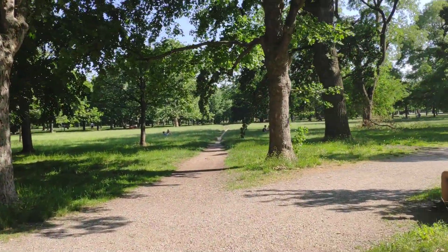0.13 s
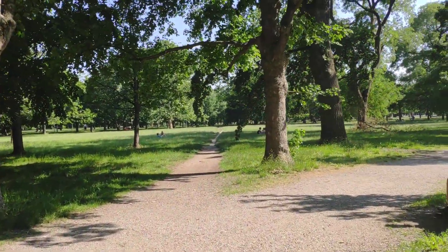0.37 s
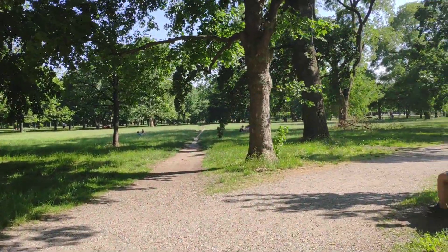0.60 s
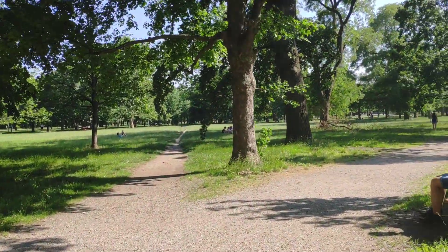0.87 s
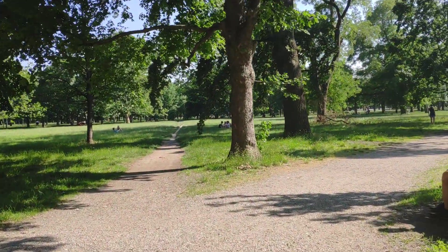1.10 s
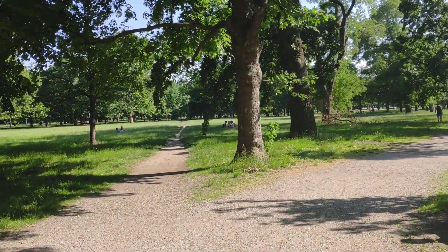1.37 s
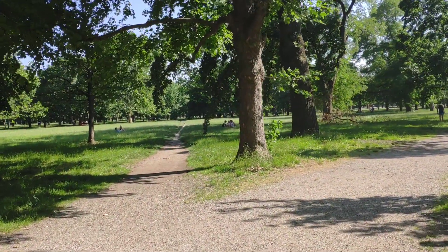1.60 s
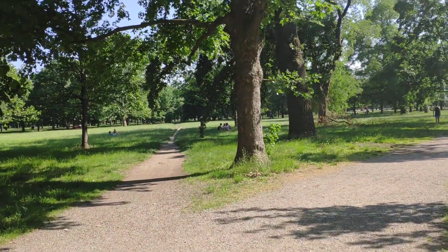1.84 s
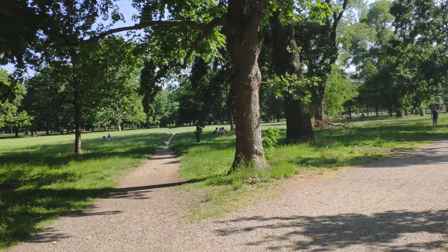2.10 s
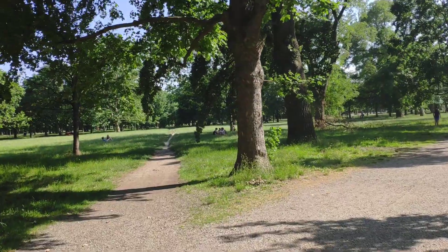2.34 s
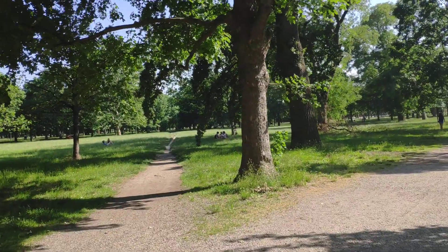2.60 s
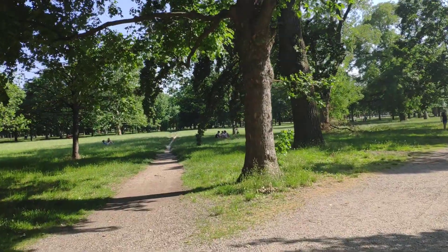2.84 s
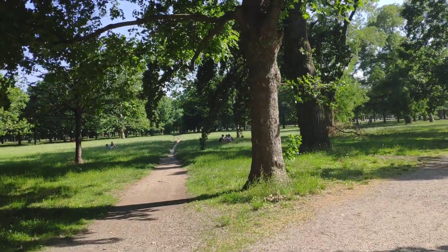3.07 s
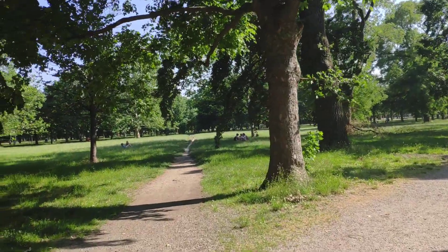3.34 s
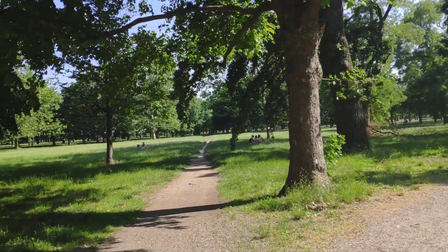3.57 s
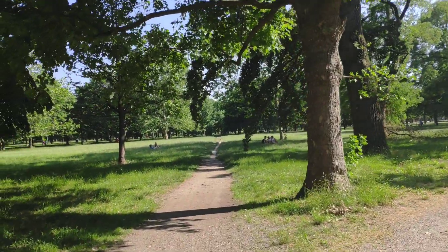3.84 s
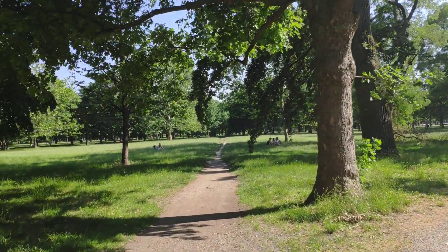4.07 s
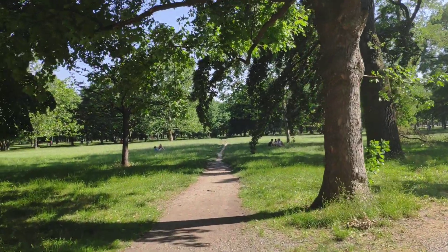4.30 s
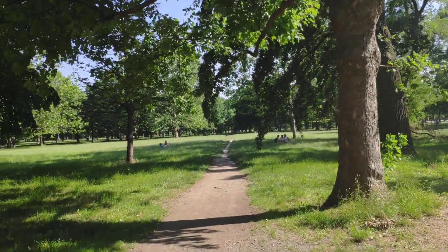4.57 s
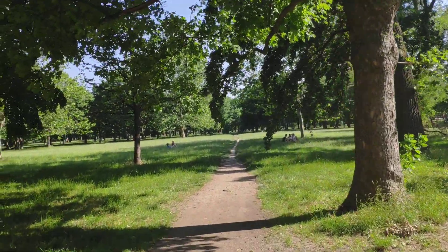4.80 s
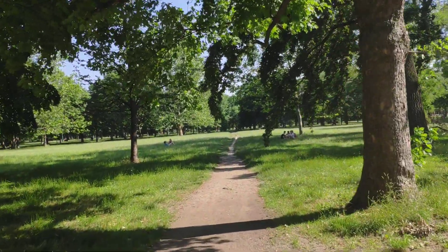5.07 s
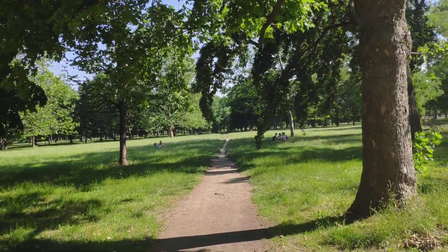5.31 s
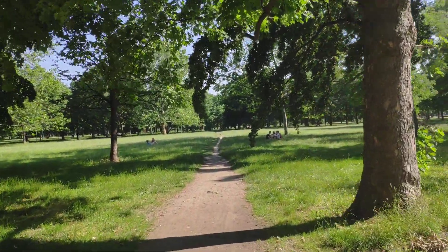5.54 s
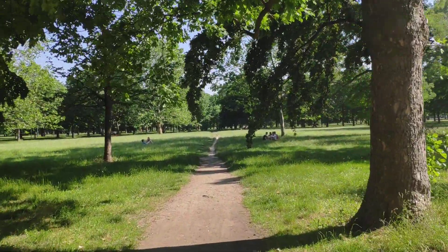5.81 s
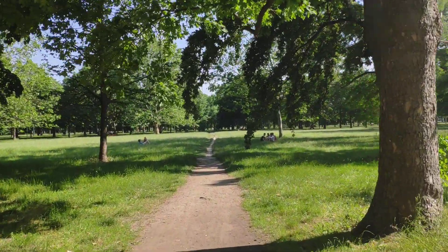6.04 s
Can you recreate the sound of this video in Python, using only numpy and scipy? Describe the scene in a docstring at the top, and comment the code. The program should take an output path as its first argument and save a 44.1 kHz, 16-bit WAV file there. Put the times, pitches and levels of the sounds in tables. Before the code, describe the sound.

Outdoors in an open park, a walker's shoes grind gravel close below the microphone, dry with hardly any echo. Early steps are partly masked by gusty flapping wind at the left, strongest near the middle; bass puffs and a few suction pops hit the right. Later steps carry sharper pebble knocks as the gusts die down, over faint leaf hiss and a barely perceptible high whine.

```python
"""A walker takes eleven crunching steps on a gravel path in a park: grains click as filtered random pulses,
and single pebbles crack as short damped modes, with a brief scattered tail.
Wind buffets the left port of a small two-microphone camera hard and the right one mainly in the bass,
as sums of pressure wiggles. Leaves and a far city hiss behind as shaped noise, and a faint whine wavers."""
import sys
import numpy as np
from scipy import signal
from scipy.fft import rfft, irfft
from scipy.io import wavfile
from scipy.ndimage import uniform_filter1d

SR = 44100
rng = np.random.default_rng(int(sys.argv[2]) if len(sys.argv) > 2 else 0)


def magnitude_from_level(level_db):
    """Linear magnitude for a level in decibels (20 dB per decade)."""
    exponent = np.asarray(level_db, float) / 20
    return 10 ** exponent


def materialize(psi):
    """Save the field psi as 16-bit PCM at rate SR to the path in sys.argv[1].

    A 1-D psi becomes a single channel; in a 2-D psi each row is a channel.
    """
    bounded = np.clip(np.atleast_2d(psi).T, -1, 1)
    quanta = np.round(bounded * 32767).astype(np.int16)
    wavfile.write(sys.argv[1], SR, quanta)


N = 272097  # samples


def read(points, hz):
    """Spectral interpolation: the value of a spectrum table at hz, linear along log frequency."""
    f, value = np.transpose(points)
    return np.interp(np.log(hz + 1), np.log(f + 1), value)


def evened(x):
    """Power normalisation: the signal scaled to rms 1."""
    return x / np.sqrt(np.mean(x ** 2) + 1e-20)


def add(mix, s, sound):
    """Superposition: mixes a sound in at s seconds."""
    part = mix[round(s * SR):][:len(sound)]
    part += sound[:len(part)]


def train(per_s, spread_db):
    """Random pulse process: clicks of either sign, a few of them large."""
    when, sign, size = rng.random((N, 3)).T
    happens = when < per_s / SR
    size_db = spread_db * np.minimum(-np.log(size + 1e-9), 4)
    return happens * np.sign(sign - .5) * magnitude_from_level(size_db)


def lumps(ms):
    """Low-pass noise: slow chance of rms 1, white noise averaged twice over ms."""
    width = max(round(ms * SR / 1000), 2)
    once = uniform_filter1d(rng.standard_normal(N), width)
    return evened(uniform_filter1d(once, width))


def slopes_db(t, start, hold, rise_db_per_s, fall_db_per_s):
    """Exponential rise and decay: 0 dB while held, sloping away before and after."""
    before_db = -rise_db_per_s * np.maximum(start - t, 0)
    return before_db - fall_db_per_s * np.maximum(t - start - hold, 0)


def wiggle(turns, cycles):
    """Localised pressure fluctuation: the smooth swing of one eddy under a Gaussian envelope."""
    return np.cos(2 * np.pi * turns) * np.exp(-(turns / cycles) ** 2)


def eddies(sizes, level_db, count, dense=.7, cycles=0.77, spread_db=3.0, lumpy_db=2.0, lump_ms=12):
    """Turbulence as superposed eddies: pressure wiggles of all sizes come in the same short bursts."""
    burst_db = lumpy_db * lumps(lump_ms)
    out = 0
    for hz in np.geomspace(sizes[0][0], sizes[-1][0], count):
        turns = hz * np.arange(-3 * SR // hz, 3 * SR // hz) / SR
        passing = train(dense * hz, spread_db) * magnitude_from_level(burst_db)
        pressure = evened(signal.oaconvolve(passing, wiggle(turns, cycles), "same"))
        out = out + magnitude_from_level(read(sizes, hz) + level_db(hz)) * pressure
    return out


# Wind at the left port. Each row: time in seconds, slow rumble level in dB, flutter level between gusts in dB.
LEFT_WIND_LEVELS = [(0.0, -31, -33), (0.7, -29, -32), (1.3, -29.5, -30.5), (1.9, -28.5, -39.5),
                    (2.9, -29, -39), (3.45, -28.5, -23.5), (3.75, -27, -52.5), (4.0, -29.5, -37),
                    (5.03, -28, -38), (5.27, -37.5, -52), (5.6, -33, -53), (6.16, -33, -53)]
# Gusts that set the left port fluttering. Each row: start in seconds, hold in seconds, flutter level in dB.
FLUTTER_GUSTS = [(0.0, 0.014, -27), (0.09, .005, -25.5), (0.158, 0.036, -20), (0.451, 0.0073, -22),
                 (0.561, 0.016, -21), (0.67, .12, -20), (0.815, 0.041, -21.5), (0.998, 0.029, -23),
                 (1.093, 0.022, -23), (1.23, 0.11, -22.5), (1.494, 0.006, -23), (1.567, 0.015, -30.5),
                 (1.777, 0.1, -30), (2.074, 0.073, -26), (2.197, 0.21, -21.5), (2.544, 0.0091, -31),
                 (2.682, 0.011, -23.5), (2.721, 0.059, -17), (2.83, 0.071, -16.5), (2.922, 0.11, -20.5),
                 (3.246, 0.027, -20), (3.305, 0.023, -24.5), (3.422, 0.046, -23.5), (3.584, 0.0079, -28),
                 (3.731, 0.036, -29.5), (3.841, 0.027, -25), (3.92, 0.029, -28), (4.074, 0.0096, -26),
                 (4.176, 0.014, -23), (4.234, .25, -22.5), (4.652, 0.033, -22), (4.919, 0.072, -25.5),
                 (5.158, 0.0089, -42), (5.4, .01, -39.5), (5.6, 0.097, -35.5), (5.85, 0.013, -35),
                 (6.083, 0.0093, -44)]
# Eddy sizes at the left port by their pitch. Each row: frequency in Hz, level in dB against the wind level.
LEFT_EDDY_SPECTRUM = [(48, -15.5), (80, -11), (140, -4), (250, -3), (450, -5), (800, -7), (2000, -36.5)]


def left_wind():
    """Scale-dependent turbulence: rumble rules large eddies, flutter small ones; gusts feed the smallest most."""
    t = np.arange(N) / SR
    at, *levels = np.transpose(LEFT_WIND_LEVELS)
    rumble_db, flutter_db = (np.interp(t, at, db) for db in levels)
    for start, hold, db in FLUTTER_GUSTS:
        gust_db = db + slopes_db(t, start, hold, rise_db_per_s=306, fall_db_per_s=276)
        flutter_db = np.maximum(flutter_db, gust_db)

    def level_db(hz):
        """Spectral weighting: the share of rumble and flutter at one eddy pitch."""
        small = np.clip(np.log2(hz / 90) / 2.62, 0, 1)
        extra_db = 0.68 * max(np.log2(hz / 480), 0) * (flutter_db + 14.5)
        return (1 - small) * rumble_db + small * flutter_db + extra_db

    return eddies(LEFT_EDDY_SPECTRUM, level_db, count=14)


# Wind at the right port. Each row: time in seconds, rumble level in dB.
RIGHT_WIND_LEVELS = [(0.0, -26.5), (0.4, -30), (0.6, -29.5), (1.45, -22.5), (1.6, -31), (1.83, -23),
                     (2.2, -31.5), (2.43, -19.5), (2.55, -27.5), (2.84, -23), (3.05, -23.5), (3.37, -26.5),
                     (3.48, -29), (3.6, -27.5), (4.6, -31), (4.87, -29.5), (5.7, -32), (6.16, -31)]
# Eddy sizes at the right port by their pitch. Each row: frequency in Hz, level in dB against the wind level.
RIGHT_EDDY_SPECTRUM = [(22, -11), (45, -15), (90, -15), (180, -23.5), (350, -33.5)]


def right_wind():
    """Low-frequency turbulence: one rumble level drives every eddy size."""
    rumble_db = np.interp(np.arange(N) / SR, *np.transpose(RIGHT_WIND_LEVELS))
    return eddies(RIGHT_EDDY_SPECTRUM, lambda hz: rumble_db, count=9, spread_db=2.0, lumpy_db=0.5, lump_ms=8.3)


# Spectrum of leaves and far traffic. Each row: frequency in Hz, level in dB.
AIR_SPECTRUM = [(100, -85), (250, -88), (500, -80.5), (1200, -83), (16000, -100)]
# Likeness of the air at left and right. Each row: frequency in Hz, coherence from 0 to 1.
AIR_LIKENESS = [(300, 0.19), (900, 0.17), (2400, 0.033), (4400, 0.029)]


def air():
    """Partly coherent diffuse noise: random short-time spectra with drifting patches and a slow swell."""
    frames, hz = N // 128 + 5, np.fft.rfftfreq(512, 1 / SR)
    a, b, c, d, patches = rng.standard_normal((frames, 257, 5)).T
    patches = evened(uniform_filter1d(uniform_filter1d(patches, 8, 0), 20, 1))
    swell = np.resize(lumps(380)[::128], frames)
    same = np.clip(read(AIR_LIKENESS, hz), 0, 1)[:, None]
    left = a + 1j * b
    right = same * left + np.sqrt(1 - same ** 2) * (c + 1j * d)
    level_db = read(AIR_SPECTRUM, hz)[:, None] + .8 * patches + .4 * swell
    spectra = np.array([left, right]) * magnitude_from_level(level_db) * np.sqrt(SR / 512)
    return signal.istft(spectra, nperseg=512, noverlap=384)[1][:, :N]


def whine():
    """Phase modulation: a faint wavering tone of the camera, stronger on the right."""
    turning = 2 * np.pi * 14879 * np.arange(N) / SR  # 14879 Hz
    tone = magnitude_from_level(-80) * np.sin(turning + 1.2 * lumps(5))
    return np.outer([.5, 1], tone)


def ring(hz, cycles, rise=0.24):
    """Damped oscillation of a struck stone: swells in part of a cycle, dies by a factor e in the given cycles."""
    turns = hz * np.arange(1, 400) / SR
    return np.sin(2 * np.pi * turns) * np.exp(-turns / cycles) * (1 - np.exp(-turns / rise))


# Grit grinding as the sole rolls from heel to toe. Each row: heel time in seconds, roll in seconds,
# heel level in dB, midfoot level in dB, toe level in dB, fineness in dB per octave.
FOOTSTEPS = [(0.07, .1, -42.5, -49.5, -52, 0), (0.605, 0.088, -47, -54, -42.5, -0.5),
             (1.164, .1, -41, -51, -36, 0.3), (1.75, 0.16, -41.5, -45, -49.5, 0.5),
             (2.285, .15, -43.5, -37.5, -47, -1.8), (2.856, 0.07, -38, -42, -42.5, -3),
             (3.406, 0.079, -48, -47, -39, -1.5), (4.0, 0.12, -41.5, -53.5, -44, -2.9),
             (4.537, 0.12, -35, -41, -46, -1), (5.101, 0.11, -39, -39.5, -39.5, -1.8),
             (5.61, 0.11, -52, -38.5, -42, -1.4)]
# Spectrum of the grains. Each row: frequency in Hz, level in dB for a grain.
GRAIN_SPECTRUM = [(400, -13.5), (1000, -2), (2500, -7), (5000, -11), (8000, -20), (15000, -10)]


def grit(count=28):
    """Granular friction: many small stones slip and click, each kind with its pitch and spot under the foot."""
    t = np.arange(N) / SR
    power, fine = scuff_power(t), np.zeros(N)
    for heel, roll, *sole_db, tilt_db in FOOTSTEPS:
        rolling_db = np.interp(t, heel + roll * np.array([0, .5, 1]), sole_db)
        step_db = rolling_db + slopes_db(t, heel, roll, rise_db_per_s=700, fall_db_per_s=297)
        power += magnitude_from_level(2 * step_db)
        fine[t > heel - roll] = tilt_db
    load = np.sqrt(power) * magnitude_from_level(3.3 * lumps(8.4))  # stones give way in clumps
    out = np.zeros((2, N))
    for hz in np.geomspace(500, 15000, count):
        lag, lean = rng.uniform(-1.56, 1, 2)
        grain_db = read(GRAIN_SPECTRUM, hz) + fine * np.log2(hz / 3500)
        clicks = train(5.0 * np.sqrt(hz), 3.52) * load * magnitude_from_level(grain_db)
        sound = signal.oaconvolve(clicks, ring(hz, 1.29) * np.sqrt(hz / 3500))[:N]
        left = sound * magnitude_from_level(3.5 * lean)
        right = np.roll(sound, round(6.5 * lag)) * magnitude_from_level(-3.5 * lean)  # lag in samples
        out += [left, right]
    return magnitude_from_level(6.0) * out


# Single pebbles that crack. Each row: time in seconds, level in dB, ring frequency in Hz,
# snap level in dB against the pebble's level.
PEBBLE_CRACKS = [(0.079, -30, 3660, -22), (0.1586, -31, 2040, -2), (0.673, -36, 3300, -4),
                 (0.689, -34, 2700, -12), (0.707, -36, 3000, -18), (0.7543, -32.5, 2050, -18),
                 (0.929, -36.5, 2050, 1), (1.1618, -24, 1290, 3), (1.1612, -16, 3220, -10.5),
                 (1.2201, -32.5, 3020, 7), (1.2595, -27, 1640, -20.5), (1.7424, -29, 2450, -9),
                 (1.7613, -31, 2650, -14), (2.032, -29.5, 1040, -9), (2.288, -28, 1980, -11),
                 (2.317, -28, 2400, -15), (2.378, -29, 2300, -16), (2.446, -33.5, 2200, -20),
                 (2.845, -34, 2360, -8), (2.8553, -30, 950, -8), (2.8754, -30, 2290, -10),
                 (2.883, -21, 2270, -13), (2.899, -26, 3670, -22), (2.9137, -2, 1300, -54),
                 (3.412, -24, 2300, -26), (3.4829, -10, 1080, -13), (3.74, -31, 1270, -22),
                 (3.7953, -26.5, 1410, -19), (4.1429, -22, 1450, -10), (4.2083, -14, 1450, -10),
                 (4.2095, -19, 1830, -8), (4.329, -34, 2020, -21), (4.532, -18.5, 1260, -8),
                 (4.5656, -23, 2570, -29), (4.6118, -16.5, 1070, -23), (4.6233, -11, 1260, -23),
                 (5.0602, -28.5, 1850, -34), (5.0967, -26, 2240, -16), (5.121, -36, 1020, -24),
                 (5.1582, -13, 1180, -30), (5.161, -21, 1400, -13), (5.177, -0.5, 1060, -25),
                 (5.211, -20, 1040, -8), (5.336, -32, 1740, -12), (5.4511, -36, 980, -25),
                 (5.4782, -36, 1120, -21), (5.5023, -34, 2960, -14), (5.6074, -27.5, 2430, -14),
                 (5.619, -27, 1220, -3.5), (5.6595, -21.5, 3760, -11), (5.6935, -23.5, 3500, -13),
                 (5.707, -25, 3100, -16)]


def cracks():
    """Modal impact: a pebble briefly rings with a higher mode, a bright rattle of chips on top."""
    out = np.zeros((2, N))
    t = np.arange(399) / SR
    noise = rng.standard_normal((len(PEBBLE_CRACKS), 3, 399))
    for (s, db, hz, snap_db), chips in zip(PEBBLE_CRACKS, noise):
        for port, side in enumerate((1, -1)):
            envelope = np.exp(-t / 0.00059) * (1 - np.exp(-t / 0.00088))
            rattle = (chips[2] + .5 * chips[port]) * envelope
            rattle = signal.lfilter([1, -1], [1, -1.5, .72], rattle)  # chips ring near 3 kHz, too small for bass
            modes = ring(hz * (1 + 0.065 * side), 0.69) + magnitude_from_level(-12.5) * ring(hz * 2.02, 0.67)
            modes = signal.lfilter(*signal.butter(2, min(3.4 * hz, 18000), fs=SR), modes)  # the blow is not instant
            gain = magnitude_from_level(db + (3.5 + side) * 0.5)
            add(out[port], s, gain * (2.41 * modes + magnitude_from_level(snap_db) * rattle))
    # a pebble moves little air
    return signal.sosfilt(signal.butter(2, 520, "high", fs=SR, output="sos"), out)


def nearby(x, t60=0.019, first_ms=2.6):
    """Scattering: legs, ground and trunks return each click in a short tail, falling 60 dB in t60 seconds."""
    at = np.arange(0, 6000, 22) + rng.integers(0, 22, (2, 273))
    echoes = rng.choice([-1., 1.], at.shape) * magnitude_from_level(-60 * at / SR / t60)
    taps = np.zeros((2, 6100))
    np.put_along_axis(taps, at, echoes, 1)
    taps = taps / np.linalg.norm(taps[0])
    taps = np.pad(taps, ((0, 0), (round(first_ms * SR / 1000), 0)))
    return signal.fftconvolve(x, taps, axes=1)[:, :N]


# The strongest single eddies at the left port. Each row: time in seconds, level in dB, frequency in Hz.
STRONG_EDDIES = [(0.1713, -10, 510), (0.2047, -10.5, 507), (0.654, -16, 596), (0.7409, -13, 696),
                 (1.1004, -9.5, 350), (1.5059, -10, 515), (1.5789, -14, 546), (2.661, -10.5, 476),
                 (2.743, -3, 474), (2.82, -8.5, 710), (2.8986, -9, 670), (3.2513, -5.5, 800),
                 (3.3492, -8, 585), (3.4559, -8, 537), (3.84, -13.5, 410), (4.1767, -10.5, 553),
                 (5.0308, -11, 345)]


def add_buffets(left):
    """Vortex suction: each strong eddy passes as a brief negative pressure wiggle."""
    for s, db, hz in STRONG_EDDIES:
        turns = hz * np.arange(-300, 300) / SR
        add(left, s - 300 / SR, -magnitude_from_level(db) * wiggle(turns, 0.54))


# A shoe brushes the path as it swings. Each row: time in seconds, level in dB, length in seconds.
SHOE_SCUFFS = [(0.333, -56, .04), (0.76, -57, .03), (1.05, -55, 0.032), (2.19, -53.5, 0.3),
               (2.972, -49, 0.036), (3.27, -56.5, 0.23), (3.53, -52, 0.029), (4.46, -49, 0.04),
               (5.003, -57, .05), (5.416, -54, 0.047), (5.53, -49, .04)]


def scuff_power(t):
    """Sliding friction: each brush of the shoe loads the grit with a Gaussian swell of power."""
    return sum(magnitude_from_level(2 * db) * np.exp(-((t - s) / length) ** 2) for s, db, length in SHOE_SCUFFS)


# Sharp suction pops at the right port. Each row: time in seconds, level in dB, time scale in ms.
SUCTION_POPS = [(1.7415, -21, 0.95), (2.7502, -17, 0.42), (3.7754, -7.5, 0.75), (4.7168, -9, 0.59),
                (4.875, -8.5, 0.66)]


def add_pops(right):
    """Pressure transient: a fast drop, then a damped rebound."""
    for s, db, ms in SUCTION_POPS:
        u = np.arange(-80, 300) / (SR * ms / 1000)
        drop = np.exp(-(u / 0.19) ** 2)
        rebound = np.exp(-u / 1.7) * np.cos(1.4 * u)
        add(right, s - 80 / SR, -magnitude_from_level(db) * np.where(u < 0, drop, rebound))


def wind():
    """Superposed turbulence: eddies on each port, with buffets at the left and pops at the right."""
    out = np.array([left_wind(), right_wind()])
    add_buffets(out[0])
    add_pops(out[1])
    return out


# Colour of the microphone cavities, left then right. Each row: frequency in Hz, gain in dB.
PORT_COLOURS = [
    [(1400, 3), (2000, 3), (2450, 7), (3100, 2), (4500, 5.5), (6200, 14), (8800, 3), (11300, 0),
     (12800, -9.5), (15500, -1)],
    [(1400, -1.04), (2000, -1), (2450, 4.5), (3400, 4.5), (5000, 3.5), (7500, -1), (11300, 3),
     (12600, -4.5), (15500, -4.5)],
]


def through_ports(heard):
    """Minimum-phase resonance: each cavity colours the sound, its ring following the click."""
    hz = np.fft.rfftfreq(512, 1 / SR)
    cepstrum = irfft(np.log(magnitude_from_level([read(port, hz) for port in PORT_COLOURS])))
    cepstrum[:, 1:256] *= 2  # folding makes the response causal
    cepstrum[:, 257:] = 0
    response = irfft(np.exp(rfft(cepstrum)))
    return signal.oaconvolve(heard, response, axes=1)[:, :N]


def scene():
    """Linear superposition: sound in the air coloured by each port's cavity, plus wind on each port."""
    feet = grit() + cracks()
    heard = feet + magnitude_from_level(-16) * nearby(feet) + air()
    return through_ports(heard) + wind()


def band_limit(x):
    """A steep low-pass at the top of the band."""
    return signal.sosfilt(signal.butter(12, 16970, fs=SR, output="sos"), x)


def record(dry):
    """Saturation and band limiting: a faint whine joins, then a soft ceiling and a treble edge."""
    held = np.tanh((dry + whine()) / 1.234) * 1.17
    edge_hz = 15750
    gains = magnitude_from_level(np.array([-0.5, 0.5, -20.0, -22.0]))
    edge = signal.firwin2(255, [0, edge_hz, edge_hz + 200, SR / 2], gains, fs=SR)
    mix = signal.oaconvolve(held, edge[None], "same")
    return band_limit(mix)


dry = scene()
out = record(dry)
materialize(out)
```